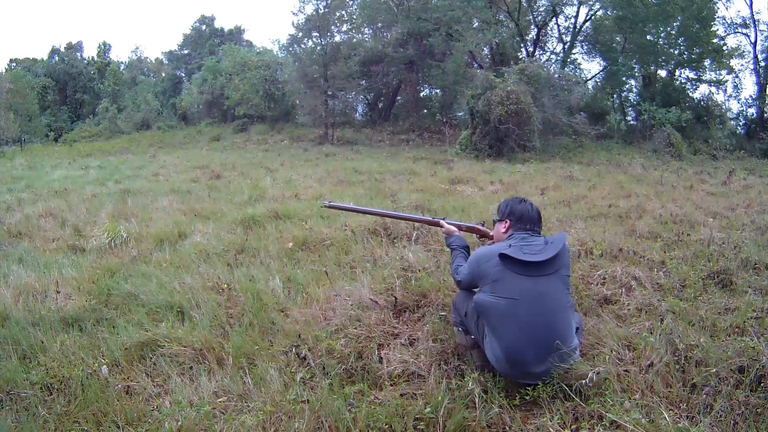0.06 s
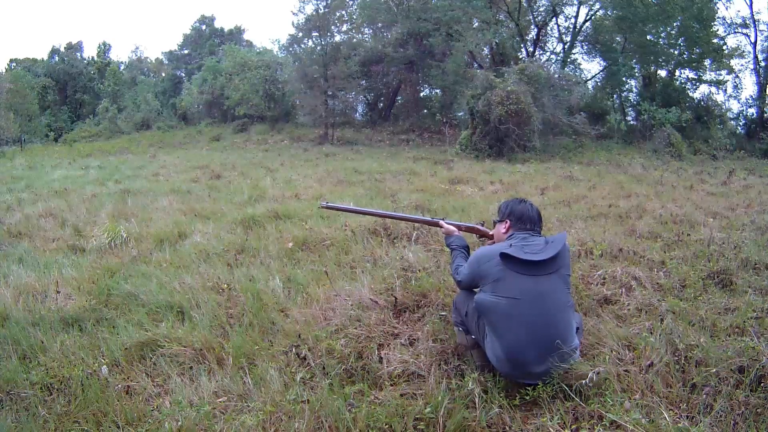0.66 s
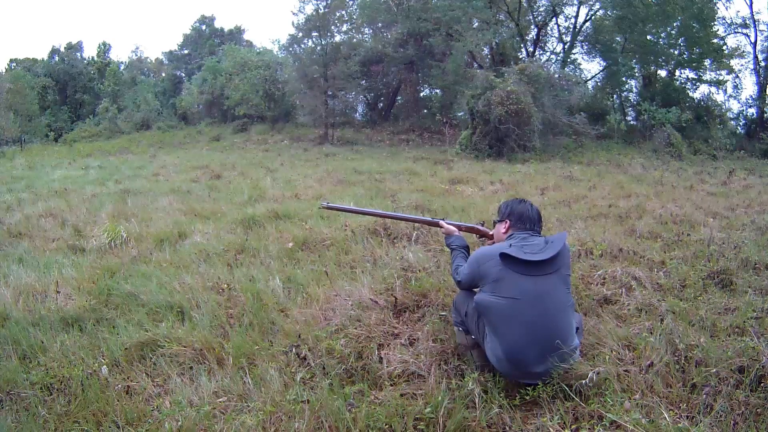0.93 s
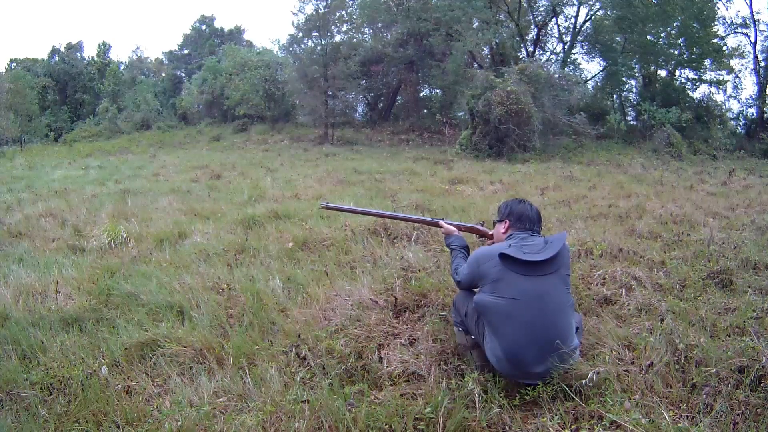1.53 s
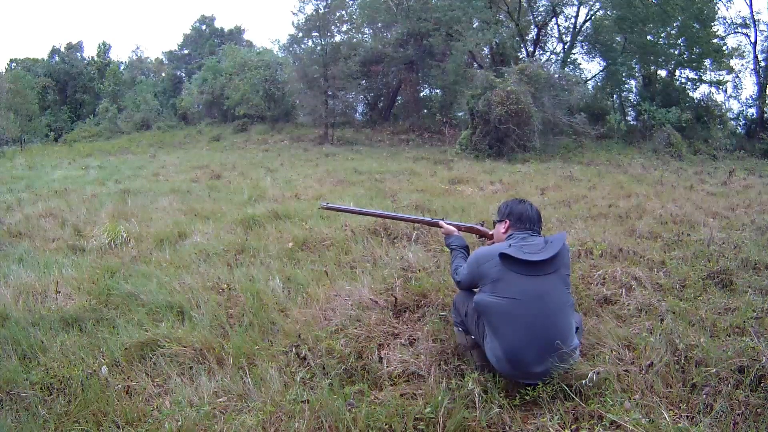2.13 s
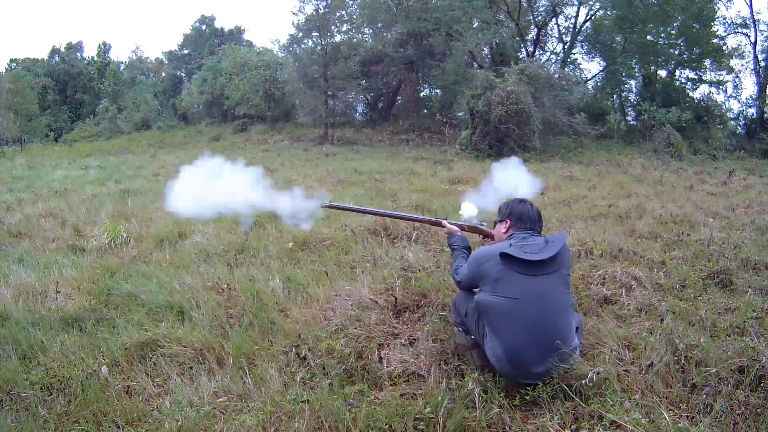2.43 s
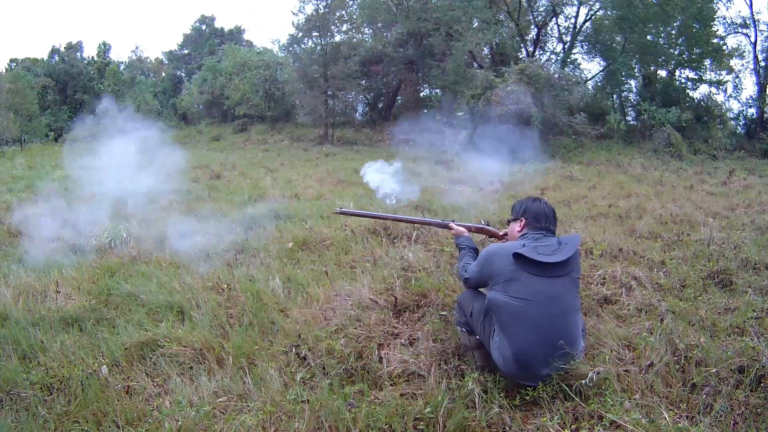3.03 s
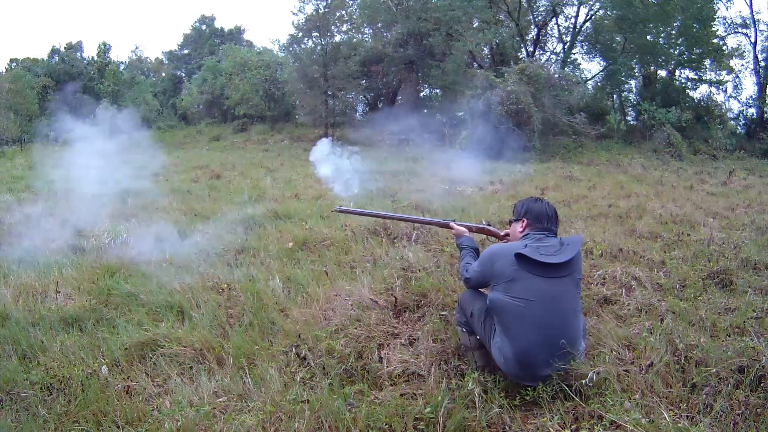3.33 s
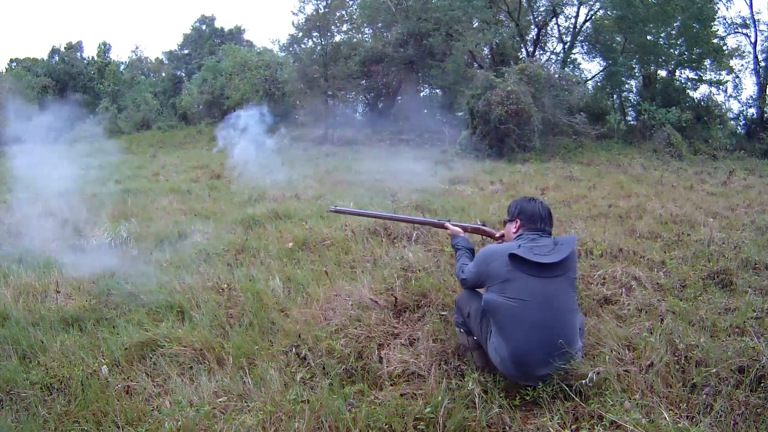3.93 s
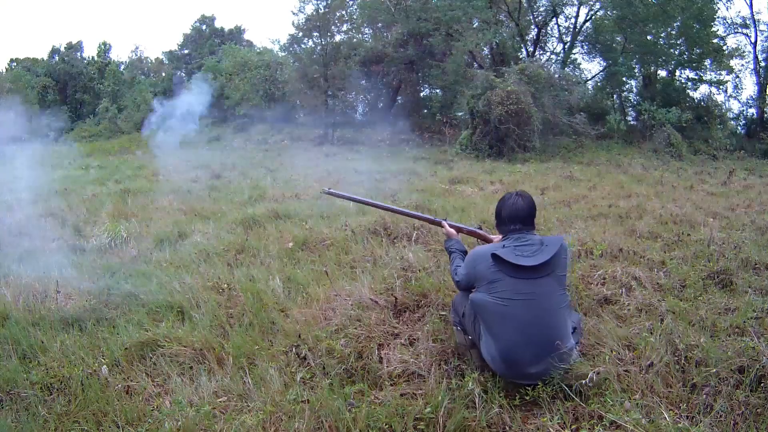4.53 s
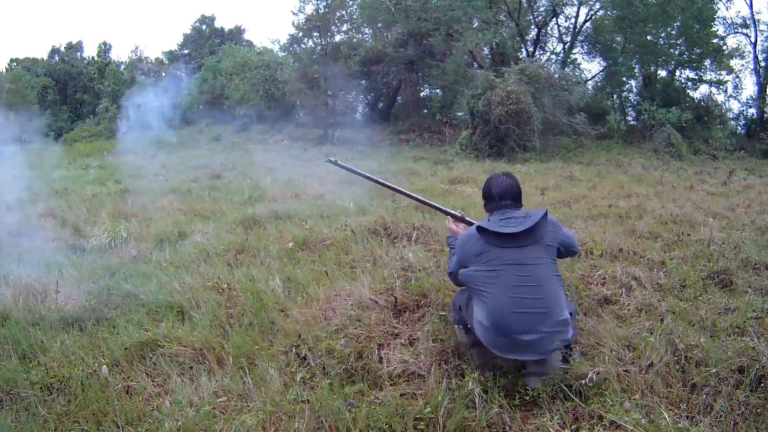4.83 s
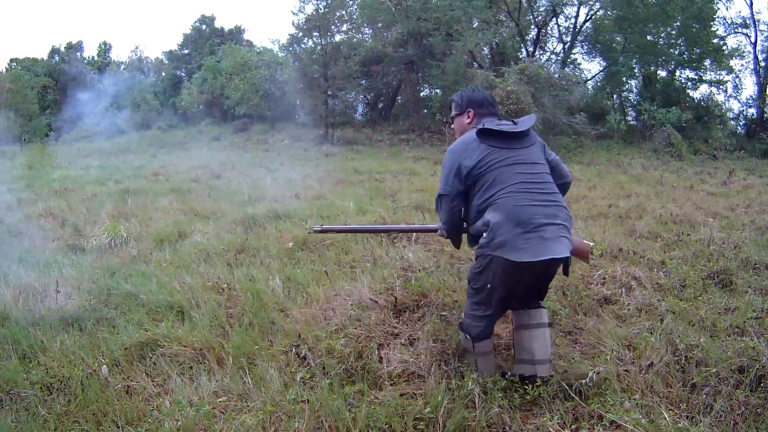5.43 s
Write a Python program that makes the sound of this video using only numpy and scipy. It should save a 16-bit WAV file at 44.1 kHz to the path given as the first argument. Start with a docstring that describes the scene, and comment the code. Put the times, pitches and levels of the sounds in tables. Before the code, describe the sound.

From the start there is only a very quiet meadow: even air hiss, a faint high chorus of distant insects, a low murmur from the woods and light wind rumbling on the microphone. At about 2.4 seconds the lock of a flintlock rifle, a few metres away, gives a faint, brief metallic click as flint scrapes steel. At about 2.55 seconds the rifle fires: one very loud, sharp bang with a short low thump, briefly overloading the microphone. The sound scatters over the grass, and quick, thin echoes slap back from trunks and bushes between about 2.6 and 3.4 seconds. They blend into a rolling reverberation that grows steadily duller and weaker, mostly gone by around 5 seconds. The faint wind and insects continue to the end, at about 5.6 seconds.

```python
"""Flintlock shot in a meadow

A flintlock rifle is fired a few metres away, in a meadow ringed by woods. The flint scrapes the
steel; after a short wait the powder goes off and overloads the microphones. Grass and bushes
scatter the bang, trunks throw back echoes, and the woods roll on, ever duller, over faint wind."""
import sys
import numpy as np
from scipy import signal
from scipy.fft import rfft, irfft, next_fast_len
from scipy.io import wavfile

SR = 44100
rng = np.random.default_rng(int(sys.argv[2]) if len(sys.argv) > 2 else 0)


def int16_out(signal):
    """Quantize to a 16-bit WAV file."""
    q = np.round(np.clip(np.atleast_2d(signal).T, -1, 1) * 32767)
    wavfile.write(sys.argv[1], SR, q.astype(np.int16))


N = 250047
TIME = np.arange(N) / SR
SHOT_S = 2.545

# A "colour" says how strong the low and high parts of a noise are. Columns: pitch_hz, relative_db
AIR_COLOUR = [(30, 3.5), (90, 1.5), (150, -1.5), (270, -3.5), (400, -10), (550, -11), (750, -17),
              (1200, -22.5), (3000, -28), (5500, -26), (8000, -39.5)]  # still air and microphone hiss
INSECT_COLOUR = [(2500, -35.5), (3600, -8.5), (4300, -2), (4800, 2.5), (5600, -3.5), (7000, -24.5)]  # a far chorus of insects
WIND_COLOUR = [(15, -1), (30, -0.5), (80, 0.5), (150, -14), (300, -21), (800, -46), (3000, -49.5)]  # wind on the microphones
MURMUR_COLOUR = [(60, -24), (150, -3), (270, 2.5), (420, -17.5), (1000, -32), (3000, -55)]  # the far woods
TRUNK_COLOUR = [(60, -16.5), (200, -19.5), (350, -13), (550, -5.5), (800, -.5), (1100, 0.5), (1400, -7),
                (2000, -8), (3000, -13), (4000, -13.5), (5500, -15), (8000, -32)]  # the bang coming back from many trunks
GRASS_COLOUR = [(30, 6), (90, 12.5), (160, 9), (300, 4.5), (450, 6), (650, -0.5), (1600, -4), (2400, -3),
                (3500, -11.5), (5500, -16.5), (8000, -30.5)]  # the bang scattered by grass
SCRAPE_COLOUR = [(300, -20), (700, -5), (1200, -2.5), (2500, 0), (3400, -4), (4500, -3), (6000, -4),
                 (8000, -22)]  # flint on steel
GAS_COLOUR = [(500, -8.5), (2000, 0.5), (5000, 1), (6000, 5), (8000, -16.5)]  # escaping powder gas

# Swells of the far murmur and the far hum. Columns: middle_s, level_db, half_length_s
MURMUR_SWELLS = [(.1, -58.5, 0.58), (2.3, -53.5, 0.19), (4.25, -53.5, 0.8)]
HUM_SWELLS = [(.33, -65.5, 0.21), (5.6, -67, 0.33)]
# The clearest echoes from bushes and trees. Columns: start_s, trunk_db, pitch_hz, treetop_db
TREE_ECHOES = [(2.583, -9, 915, -28.5), (2.596, -9, 1500, -20.5), (2.679, -13, 670, -40),
               (2.732, -7, 1160, -22.5), (2.787, -29, 1080, -25.5), (2.803, -17, 1200, -28),
               (2.856, -15.5, 1160, -29.5), (2.899, -13.5, 950, -34.5), (2.913, -15, 1160, -27.5),
               (2.941, -22, 840, -28.5), (3.003, -19, 980, -42), (3.048, -17, 930, -45),
               (3.100, -17.5, 890, -43), (3.116, -17.5, 950, -49), (3.169, -35, 940, -49),
               (3.241, -18.5, 754, -37.5), (3.365, -30, 940, -34), (3.415, -30, 1020, -42),
               (3.830, -57, 750, -46.5)]
# Flint hitting steel. Columns: start_s, level_db, fade_s (always the time to drop by 60 dB)
FLINT_HITS = [(2.3795, -46, 0.032), (2.3835, -38, 0.039), (2.3915, -35.5, .022), (2.4008, -46, 0.019),
              (2.4075, -47, 0.037)]
# Ringing tones of the lock, the rifle's firing parts. Columns: pitch_hz, relative_db, fade_s
LOCK_TONES = [(1330, -13, .04), (1750, -29, 0.078), (2710, -24, .06)]
# Puffs of escaping powder gas. Columns: start_s, level_db, fade_s
GAS_PUFFS = [(2.5365, -34.5, 0.045), (2.541, -17.5, 0.033), (2.5465, -7, .012), (2.555, -22, 0.012)]
# Pressure waves from the vent hole, the muzzle and the ground bounce, then a slow, low rebound
# just after the bang. Columns: start_s, peak_db, rise_s, push_s, pull_s
PRESSURE_WAVES = [(2.5422, 10, .0011, .0021, .0034), (2.5476, 20, .0001, .0014, .0007),
                  (2.5497, 17, .0003, .0011, .0044), (2.556, -9, .005, .012, .02)]


def from_db(db):
    """Turns decibels into a number to multiply by."""
    return 10 ** (np.asarray(db) / 20)


def cut(x, hz, kind, order=1):
    """Keeps the "low" or "high" side of a pitch; a higher order cuts more sharply."""
    return signal.sosfilt(signal.butter(order, min(hz, .45 * SR), kind, fs=SR, output="sos"), x)


def coloured(x, colour):
    """Gives steady noise a colour and sets its typical size to 1."""
    hz, db = np.transpose(colour)
    size = next_fast_len(N)
    pitches = np.maximum(np.fft.rfftfreq(size, 1 / SR), 1)
    gain = from_db(np.interp(np.log(pitches), np.log(hz), db))
    shaped = irfft(rfft(x, size) * gain, size)[..., :N]
    return shaped / np.std(shaped)


def noise(colour, apart_db):
    """Noise at two close microphones: one part shared, one part opposite in left and right."""
    shared, opposite = coloured(rng.standard_normal((2, N)), colour)
    return shared + from_db(apart_db) * opposite * [[1], [-1]]


def flutter(per_s, depth_db):
    """A loudness curve that wanders at random."""
    steps = rng.standard_normal(N // 20)
    return from_db(depth_db * np.interp(TIME * per_s, np.arange(len(steps)), steps))


def swells(rows):
    """A loudness curve of smooth rises and falls."""
    return sum(from_db(db) * np.exp(-((TIME - middle_s) / half_s) ** 2) for middle_s, db, half_s in rows)


def bursts(rows, rise_s):
    """A loudness curve of quick bursts whose energy adds up."""
    power = np.zeros(N)
    age = TIME[:SR // 2]
    for start_s, db, fade_s in rows:
        at = int(start_s * SR)
        burst = from_db(db - 60 * age / fade_s) * (1 - np.exp(-age / rise_s))
        power[at:at + len(age)] += burst ** 2
    return np.sqrt(power)


def after_shot(wait_s, rise_s, fade_s, hold_s=0):
    """A loudness curve that waits after the shot, rises, holds and dies away."""
    age = TIME - SHOT_S - wait_s
    return np.clip(age / rise_s, 0, 1) * from_db(-60 * np.maximum(age - rise_s - hold_s, 0) / fade_s)


def ring(x, hz, fade_s):
    """Makes a sound ring at one pitch."""
    decay = from_db(-60 / (fade_s * SR))
    feedback = [1, -2 * decay * np.cos(2 * np.pi * hz / SR), decay ** 2]
    return signal.lfilter(np.array([1, 0, -1]) * (1 - decay ** 2) / 2, feedback, x)


def meadow():
    """Even hiss and far insects; a low murmur of the woods and a faint hum come and go."""
    air = from_db(-53.5) * noise(AIR_COLOUR, apart_db=-14)
    insects = from_db(-72.5) * noise(INSECT_COLOUR, apart_db=-30.5)
    murmur = swells(MURMUR_SWELLS) * noise(MURMUR_COLOUR, apart_db=-15)
    hum = ring(rng.standard_normal(N), hz=547, fade_s=0.1)
    return air + insects + murmur + swells(HUM_SWELLS) * hum / np.std(hum)


def wind():
    """Light wind rumbles on the microphones, a little more on the left."""
    gusts = noise(WIND_COLOUR, apart_db=0.5) * flutter(per_s=11, depth_db=-2.0)
    return gusts * from_db([[-51.5], [-54.5]])


def treetops(rise_s=.008, fall_s=.013):
    """A loudness curve: branches and leaves scatter a short swell around each echo."""
    power = np.zeros(N)
    for echo_s, _, _, db in TREE_ECHOES:
        away = np.maximum((echo_s - TIME) / rise_s, (TIME - echo_s) / fall_s)
        power += (from_db(db) * np.exp(-np.minimum(away, 20))) ** 2
    return np.sqrt(power)


def trunks(per_s=5000, spread_db=3.0):
    """Countless tiny echoes of uneven strength arrive at random."""
    arrivals = (rng.random(N) < per_s / SR) * rng.choice([-1, 1], N)
    strength = from_db(spread_db * np.clip(rng.standard_normal(N), -2, 2))
    return coloured(arrivals * strength, TRUNK_COLOUR)


def clear_echoes(width_octaves=1.1, step_db=-7):
    """Each echo is a thin, dull slap off a trunk, trailed by weaker ones off its neighbours."""
    out, size = np.zeros(N), SR // 20
    edge = 2 ** (width_octaves / 2)
    for start_s, db, hz, _ in TREE_ECHOES:
        slap = cut(signal.unit_impulse(size), hz / edge, "high", order=3)
        slap = cut(slap, hz * edge, "low", order=3)
        gaps_s = rng.uniform(.0012, .0034, 4)
        arrivals_s = start_s + np.cumsum(gaps_s) - gaps_s[0]
        for k, at in enumerate((arrivals_s * SR).astype(int)):
            out[at:at + size] += from_db(db + step_db * k) * slap / np.abs(slap).max()
    return out


def ground_bounce(x, lag_s=0.000746, settle_s=0.14, bounce_db=-9):
    """High sound also bounces off the ground, lagging more as echoes move off: a faint falling swish."""
    lag = lag_s * (1 - np.exp(-np.maximum(TIME - SHOT_S, 0) / settle_s))
    return x + from_db(bounce_db) * np.interp(TIME - lag, TIME, cut(x, 1500, "high"))


def travelled(x, dulling=10.0):
    """Air and leaves dull later echoes: sound above 1000 Hz sinks, and sound below it gains."""
    hz, times, slices = signal.stft(x, SR, nperseg=256)
    travel_s = np.clip(times - SHOT_S, 0, 2)
    loss_db = dulling * np.outer((hz / 1000) ** 0.8 - 1, travel_s)
    return signal.istft(slices * from_db(-loss_db), SR)[1][:, :N]


def woods(wait_s=0.038, rise_s=.14):
    """The bang reaches the trees, rolls along their edge and lingers weakly deep in the woods."""
    edge = from_db(-33) * after_shot(wait_s, rise_s, fade_s=2.17, hold_s=0.4)
    deep = from_db(-49.5) * after_shot(wait_s, rise_s, fade_s=5.8)
    loudness = np.sqrt(edge ** 2 + deep ** 2 + treetops() ** 2)
    roll = loudness * trunks() * flutter(per_s=130, depth_db=0.85)
    return travelled((ground_bounce(roll) + clear_echoes())[None])


def grass():
    """Nearby grass scatters the bang as it passes; the sound then dies away."""
    loudness = from_db(-17.5) * after_shot(wait_s=.009, rise_s=.002, fade_s=0.77)
    return loudness * noise(GRASS_COLOUR, apart_db=-35.5) * flutter(per_s=180, depth_db=1.14)


def flint(ring_db=22):
    """The flint skips down the steel and flips the powder pan open; the lock rings briefly."""
    scrape = noise(SCRAPE_COLOUR, apart_db=-42) * bursts(FLINT_HITS, rise_s=0.00019)
    ringing = sum(from_db(db) * ring(scrape, hz, fade_s) for hz, db, fade_s in LOCK_TONES)
    return scrape + from_db(ring_db) * ringing


def blast(suction=0.35, thump_db=-11, thump_hz=155, thump_fade_s=.12):
    """Each wave pushes the air, sucks it back and snaps to rest; a low thump lingers and gas hisses."""
    waves = np.zeros(N)
    for start_s, db, rise_s, push_s, pull_s in PRESSURE_WAVES:
        lowest_s = push_s + suction * (push_s - rise_s)
        corners_s = start_s + np.sort([0, rise_s, lowest_s, push_s + pull_s, push_s + pull_s + rise_s])
        waves += from_db(db) * np.interp(TIME, corners_s, [0, 1, -suction, -suction / 2, 0])
    age = np.maximum(TIME - SHOT_S, 0)
    thump = -from_db(thump_db - 60 * age / thump_fade_s) * np.sin(2 * np.pi * thump_hz * age)
    gas = noise(GAS_COLOUR, apart_db=-9.0) * bursts(GAS_PUFFS, rise_s=0.00024)
    return waves + thump + gas


def scene():
    """Flint, shot and echoes over the quiet meadow."""
    return flint() + blast() + grass() + woods() + meadow() + wind()


def coarse_sampling(x, rate_hz=12000, top_hz=5500):
    """Coarse sampling keeps a narrow band and mirrors its high part to both sides of the sampling rate."""
    band = cut(x, top_hz, "low", order=14)
    highs = np.diff(cut(band, 500, "high"), prepend=0)
    mirror = highs * 2 * np.cos(2 * np.pi * rate_hz * TIME)
    return band + from_db(-0.28) * cut(mirror, 16000, "low")


def record(dry, right_bass_hz=280, cutoff_hz=15150):
    """The microphones overload, the right loses bass, highs are mirrored and the very top is cut."""
    left, right = np.clip(dry, -1, 1)
    both = np.array([left, cut(right, right_bass_hz, "high")])
    both = .97 * np.clip(coarse_sampling(both), -1, 1)
    return signal.sosfilt(signal.ellip(10, .1, 80, cutoff_hz, fs=SR, output="sos"), both)


dry = scene()
out = record(dry)
int16_out(out)
```